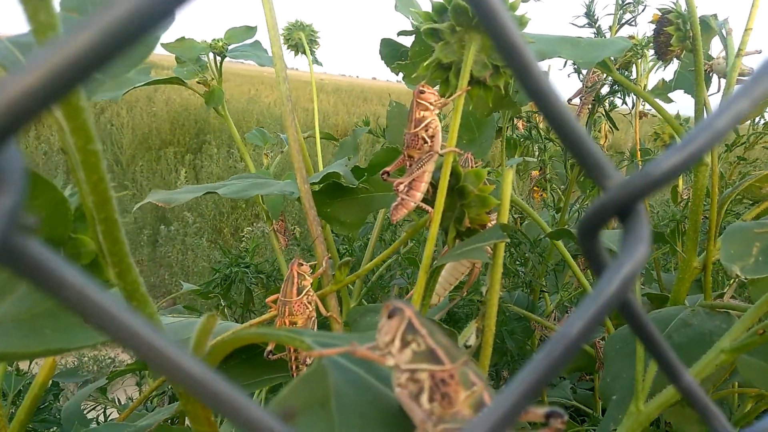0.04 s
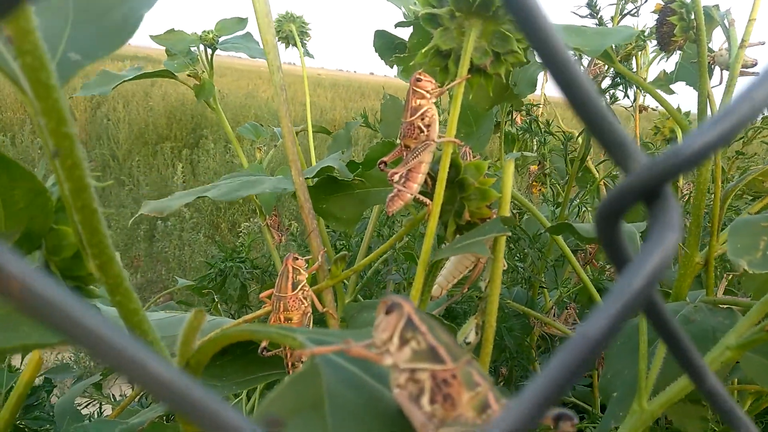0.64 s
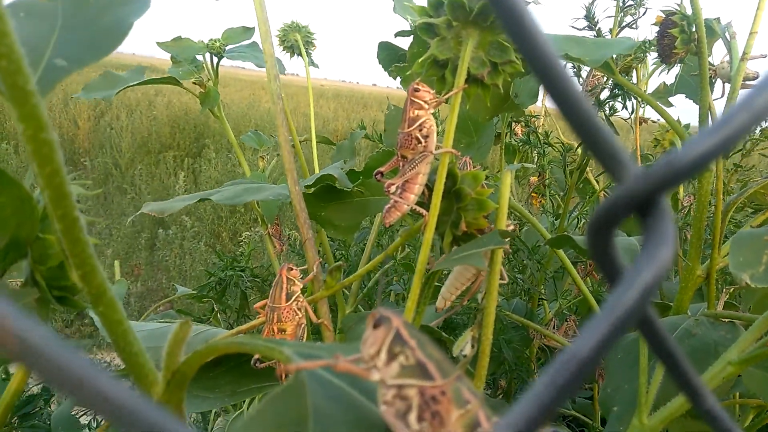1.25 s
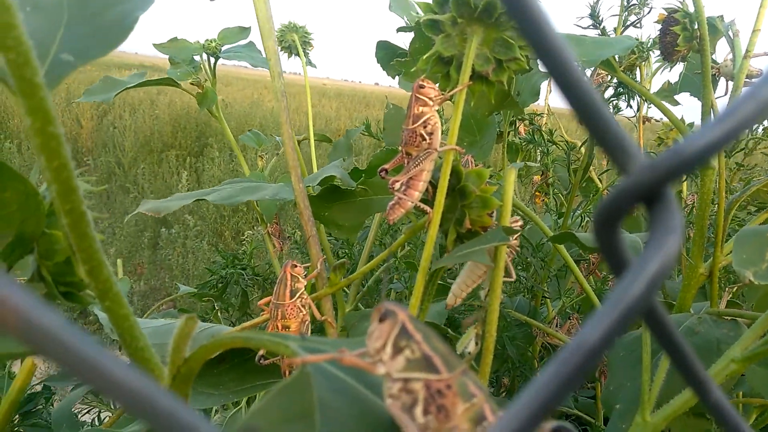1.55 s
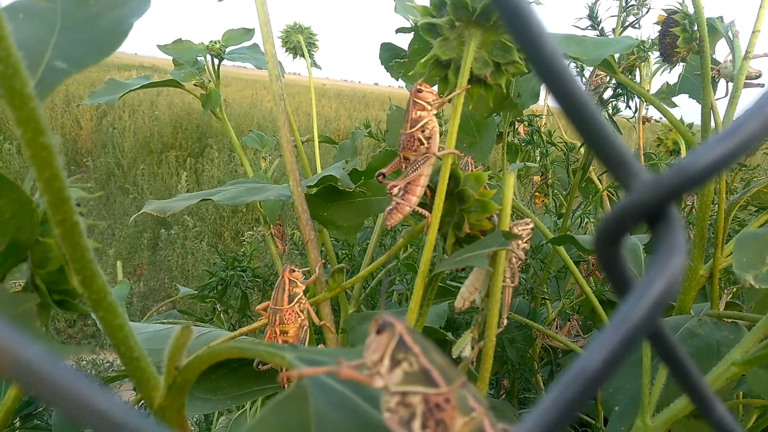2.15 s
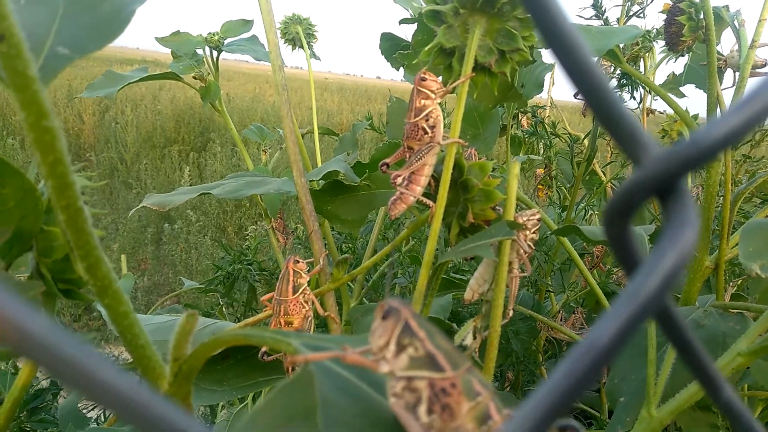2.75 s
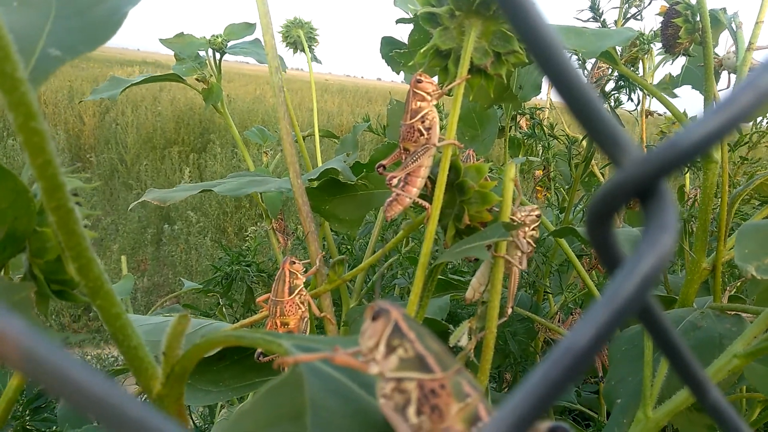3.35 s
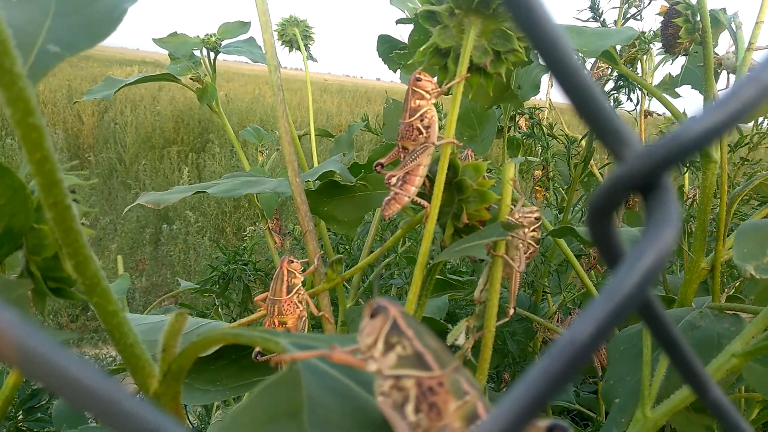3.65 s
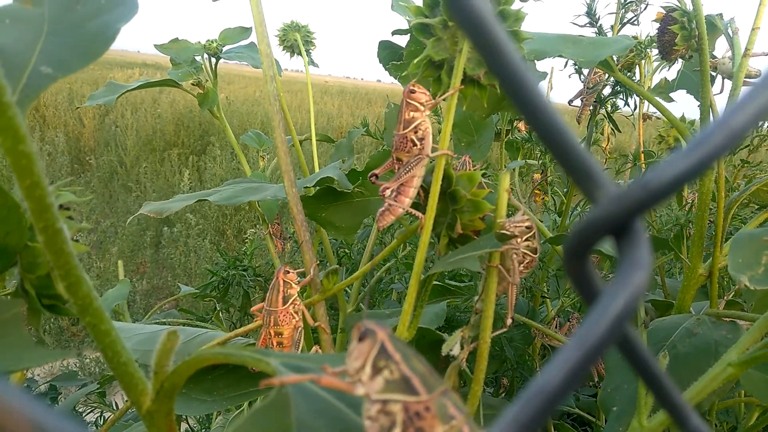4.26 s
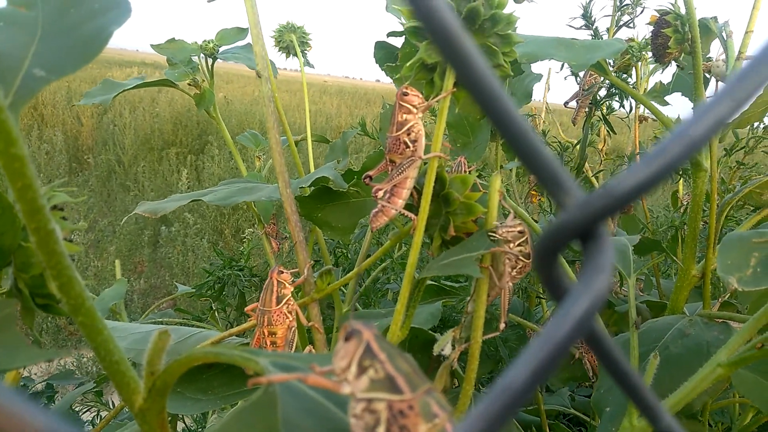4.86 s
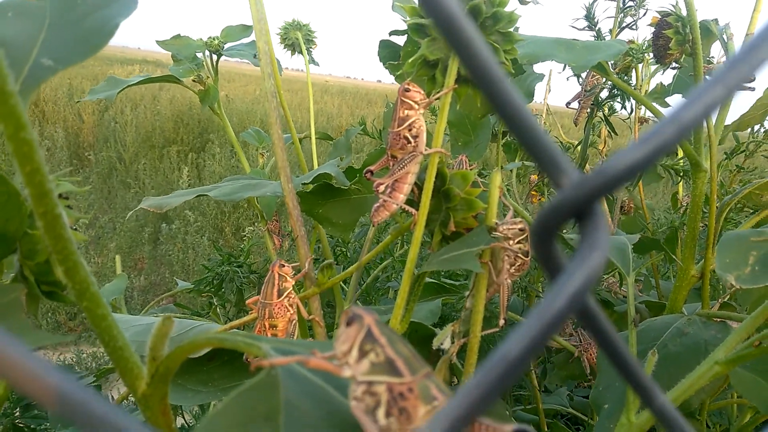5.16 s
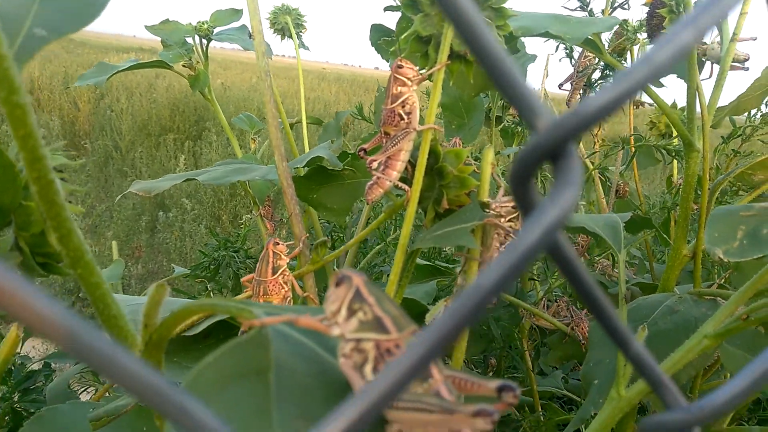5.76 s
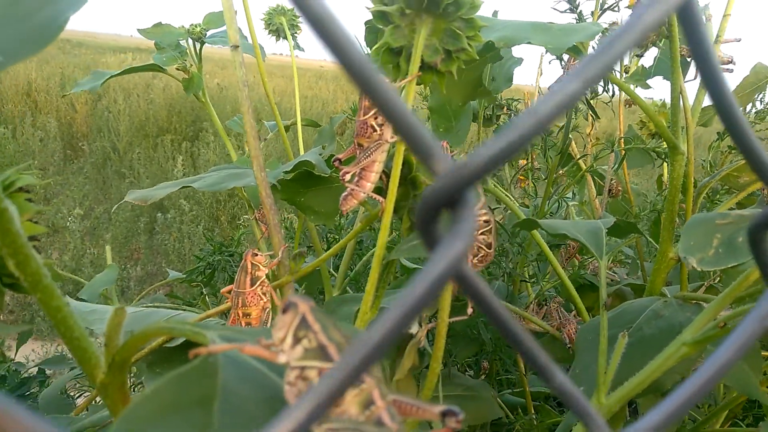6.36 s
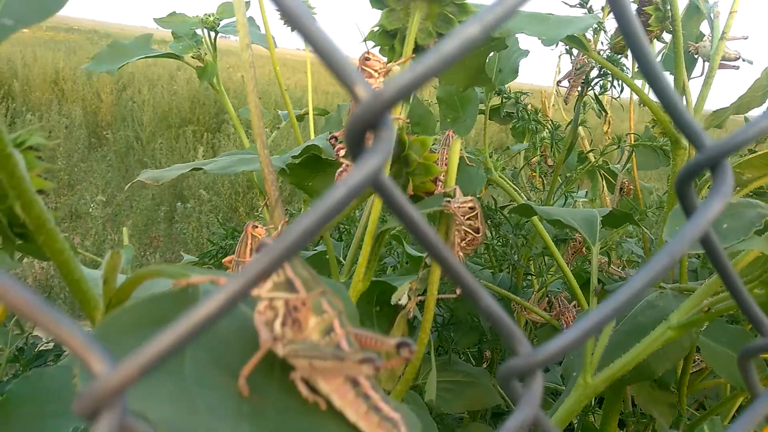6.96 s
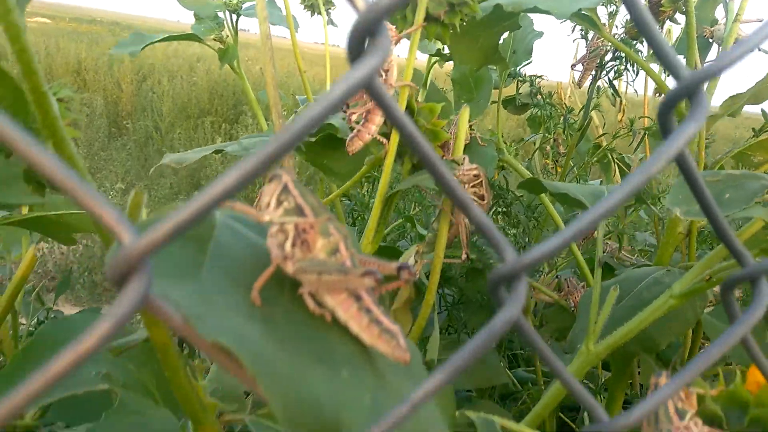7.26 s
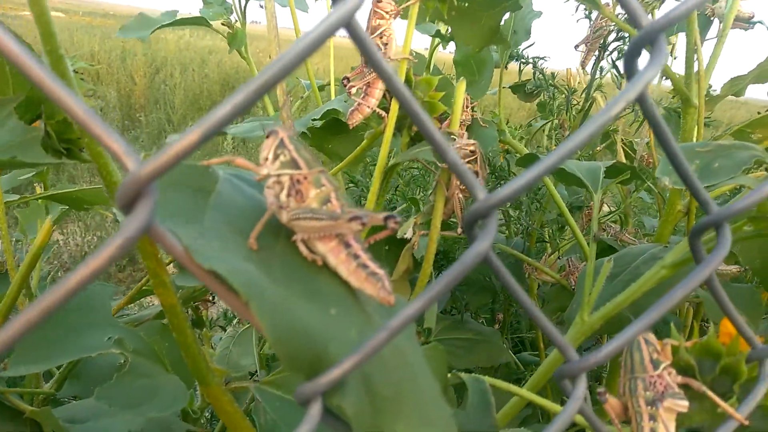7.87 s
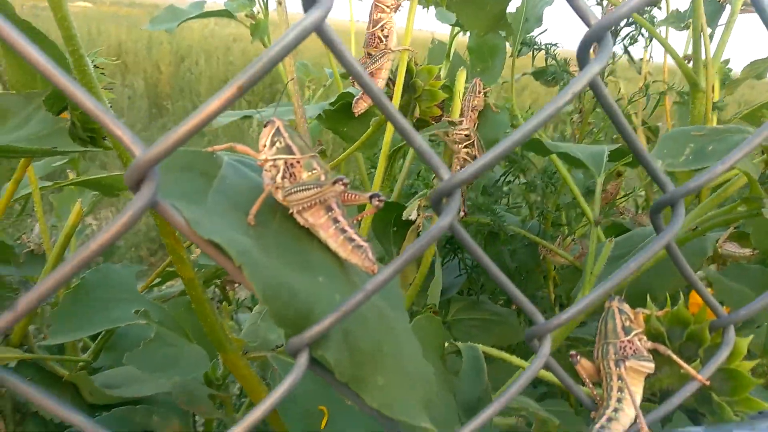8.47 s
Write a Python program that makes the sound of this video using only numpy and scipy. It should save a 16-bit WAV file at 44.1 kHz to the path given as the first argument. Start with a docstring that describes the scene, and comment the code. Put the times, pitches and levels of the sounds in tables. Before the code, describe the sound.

Insects chirp in weeds beside a field throughout: a close one gives short, high chirps once or twice a second, and a farther one chirps faintly between them. Wind rumbles on the microphone, thumping hard around 0.5 seconds, with smaller blows until about 1.8 and again near 3.6 and 5.6. A bird gives short harsh chips at 1.1 and 1.4 seconds, a raspy arched whistle at 2, and a chip with a short falling note at 2.7. More chips come near 5.2, 6.8 and 7.9. Dry stems tick now and then, most sharply at 1.9, and leaves rustle faintly. The wind builds from 7 seconds and thumps strongly near 8, when another insect trills briefly and quietly. A soft hiss and a far, low machine hum continue underneath, the hiss swelling slightly after sharp sounds. Almost everything is on the right; the left carries mostly hiss.

```python
"""Insects chirp in the weeds beside a field while gusts of wind rumble on the right microphone.
The insects scrape their wings together. A bird gives short harsh chips, an arched whistle and a
short falling note. Stems tick and leaves rustle faintly over a soft hiss and a far machine hum.
The left side is almost all hiss; a noise suppressor lets the hiss swell after sharp sounds."""
import sys
import numpy as np
from scipy import signal
from scipy.fft import rfft, irfft, next_fast_len
from scipy.io import wavfile
from scipy.ndimage import uniform_filter1d

SR = 44100
rng = np.random.default_rng(int(sys.argv[2]) if len(sys.argv) > 2 else 0)


def store_pcm(level_fs):
    """Save levels as 16-bit WAV."""
    pcm = np.round(np.clip(level_fs, -1, 1) * 32767).astype(np.int16)
    wavfile.write(sys.argv[1], SR, np.atleast_2d(pcm).T)


N = 376173
TIME = np.arange(N) / SR


def wing_stroke(level_db, start_hz, length_s, sag, roughness):
    """One wing scrapes over ridges on the other: a nearly pure tone that drops as the wing slows."""
    progress = np.linspace(0, 1, int(length_s * SR))
    # uneven scraping shakes the pitch (slip) and the loudness (grip)
    slip, grip = (np.interp(progress, np.linspace(0, 1, 12), row) for row in rng.standard_normal((2, 12)))
    slowing = .5 + .5 * np.tanh((progress - 0.557) / 0.25)
    pitch_hz = start_hz * (1 + rng.normal(0, 0.0046)) * (1 - sag * slowing + 0.031 * roughness * slip)
    force = np.abs(np.sin(np.pi * progress)) ** 0.88 * (1.3 - slowing)
    return from_db(level_db + rng.normal(0, 0.5)) * force * (1 + roughness * grip) * sine(pitch_hz)


def near_insect(loud_db=-56):
    """A close insect makes each chirp from four wing strokes, usually growing louder as they go."""
    # one chirp a row: time_s, level_db, growth_per_stroke_db
    chirps = [(-.068, -54.5, 2), (0.319, -55, 4), (1.368, -59.5, 2), (1.698, -60.5, 2.5), (2.638, -59.5, 4),
              (3.377, -56, 4.5), (3.727, -57.5, 2.5), (4.515, -60, 3), (4.833, -62.5, 1), (5.859, -57, 3),
              (6.605, -62.5, 1), (7.388, -58.5, 3), (7.885, -65, -1), (8.275, -59.5, 2)]
    # the strokes within a chirp: offset_s, relative_level_db, start_pitch_hz
    strokes = [(-.033, -9, 5200), (-.008, 0.5, 5400), (.023, 1, 5527), (.057, -0.5, 5540)]
    out = np.zeros(N)
    for time_s, level_db, growth_db in chirps:
        sag = .1 * from_db(0.95 * min(level_db - loud_db, 0))   # gentler chirps drop less in pitch
        for strokes_left, (offset_s, relative_db, start_hz) in enumerate(strokes[::-1]):
            stroke_db = level_db + relative_db - growth_db * strokes_left
            length_s = 0.027 * rng.uniform(0.88, 1.2)
            add(out, time_s + offset_s, wing_stroke(stroke_db, start_hz, length_s, sag, roughness=0.34))
    return out


def trilling_insect(start_s=7.98, spacing_s=0.031, rise_s=.05, hold_s=0.2, fade_db_per_s=80):
    """Another insect trills with twelve quick wing strokes: it builds up, holds, then tires."""
    out = np.zeros(N)
    for elapsed_s in spacing_s * np.arange(12):
        strength = min((elapsed_s + spacing_s / 2) / rise_s, 1)
        level_db = -71 - fade_db_per_s * max(elapsed_s - hold_s, 0)
        stroke = wing_stroke(level_db, start_hz=5790, length_s=0.027, sag=0.043, roughness=0.51)
        add(out, start_s + elapsed_s, strength * stroke)
    return out


def far_insect(spacing_s=0.033):
    """A farther insect chirps with three faint wing strokes that barely drop in pitch."""
    # one chirp a row: start_s, level_db
    chirps = [(1.06, -78), (1.84, -73), (2.96, -76), (3.855, -72), (5.19, -75.5), (5.6, -76.5), (6.48, -75),
              (6.915, -75.5)]
    out = np.zeros(N)
    for start_s, level_db in chirps:
        for count in range(3):
            stroke = wing_stroke(level_db, start_hz=5120, length_s=0.032, sag=0.023, roughness=0.41)
            add(out, start_s + count * spacing_s, stroke)
    return out


def wind(gustiness_db=3.2, strong_db=-26, churn_width_s=0.016):
    """Swirling air rumbles on the microphone. Finer swirls join as a gust grows; hard blows thump."""
    # wind strength through gusts and lulls: time_s, level_db
    gusts = [(0, -51.5), (.21, -70), (.5, -54), (.75, -41.5), (1.0, -44.5), (1.4, -47), (1.57, -67.5),
             (2.1, -59), (2.45, -67.5), (2.8, -54.5), (3.25, -69), (3.6, -41), (4.05, -65.5), (4.65, -63),
             (5.3, -57), (5.7, -49.5), (6.0, -71.5), (6.45, -63), (6.95, -53), (7.15, -42), (7.4, -48.5),
             (7.9, -42.5), (8.1, -41.5), (8.22, -62), (8.53, -68)]
    # soft puffs on top of the gusts: time_s, level_db
    puffs = [(.278, -45), (.359, -39.5), (.72, -51), (.8, -37.5), (.93, -60), (.99, -40), (1.2, -64),
             (1.684, -40.5), (1.959, -45.5), (2.178, -51), (3.371, -47.5), (3.482, -45), (3.817, -44),
             (3.92, -44), (4.17, -44.5), (5.011, -50.5), (5.128, -47.5), (5.253, -46.5), (5.373, -43.5),
             (5.63, -41.5), (5.801, -44), (5.979, -50), (6.673, -46.5), (6.78, -44), (7.079, -36),
             (7.451, -37.5), (7.517, -39), (7.616, -34), (7.7, -39), (7.762, -34), (8.35, -54)]
    # hard blows of air: time_s, level_db, pitch_hz, fine_swirls_db
    blows = [(0.479, -31, 138, -43.5), (.535, -19.5, 77, -38.5), (0.6, -27, 91, -35.5),
             (0.645, -30, 89.5, -49), (0.866, -31.5, 77.5, -58), (1.083, -34, 80, -69),
             (1.345, -32, 70, -71), (1.772, -31, 61, -59), (3.581, -35.5, 91, -62), (3.649, -32, 71, -56),
             (5.614, -37, 74.6, -54), (7.171, -31.5, 92, -51.5), (7.225, -30, 55.3, -60),
             (7.273, -27, 82.6, -51.5), (7.861, -23, 73.6, -40.5), (7.93, -17.5, 63.3, -38.5),
             (7.996, -21, 54.4, -52)]
    # tone colour of the big swirls: frequency_hz, level_db
    rumble_colour = [(15, -34), (28, -44), (40, -8.5), (54, 1.5), (80, -9), (120, -17), (170, -29.5),
                     (300, -54.5), (600, -65), (1500, -68.5), (6000, -125)]
    # tone colour of the fine swirls: frequency_hz, level_db
    flutter_colour = [(60, -20.5), (120, 6), (180, 1.5), (250, -8.5), (340, -19), (600, -37), (1500, -100),
                      (6000, -115)]
    gust_db, = curves(gusts)
    flow = np.hypot(from_db(gust_db + gustiness_db * drift(24)), smooth_swells(puffs, width_s=0.021))
    churn = from_db(-7) * smooth_swells(blows, churn_width_s)   # air churns around each blow
    out = np.hypot(flow, churn) * swirling_air(rumble_colour)
    fine_flow = from_db(-16) * flow * (flow / from_db(strong_db)) ** 0.44
    fine_churn = smooth_swells([(time_s, fine_db) for time_s, _, _, fine_db in blows], churn_width_s)
    out += np.hypot(fine_flow, fine_churn) * from_db(2 * drift(60)) * swirling_air(flutter_colour)
    t = np.arange(-SR // 20, SR // 20) / SR
    for time_s, level_db, pitch_hz, _ in blows:
        cycles = t * pitch_hz
        thump = np.exp(-.5 * (cycles / 0.6) ** 2) * np.sin(2 * np.pi * cycles)
        add(out, time_s + t[0], from_db(level_db) * thump)
    return filtered(out, 2, 35, "high")


def swirling_air(colour):
    """Low noise with its own slow swells evened out, so that the gusts shape its loudness."""
    swirls = noise(colour)
    return swirls / np.sqrt(uniform_filter1d(power(swirls, 0.041), SR // 60))


def bird_chips(rise_s=0.0026, throat_db=-5.5):
    """Short rattling calls swell and break off, each coloured by a ring in the bird's throat."""
    # one burst a row: start_s, level_db, length_s, decay_s, throat_hz
    chips = [(1.137, -50.5, 0.013, .016, 5500), (1.404, -47, 0.019, 0.005, 3830),
             (2.687, -51, 0.0093, 0.012, 5170), (5.173, -52, .003, 0.0059, 2300),
             (5.183, -51.5, 0.0025, .007, 5000), (6.822, -50.5, 0.019, .006, 3380),
             (7.923, -52.5, 0.012, 0.015, 3400)]
    # tone colour of the rattle: frequency_hz, level_db
    rattle_colour = [(1000, -25), (1700, -14), (2150, -4), (2700, 1.5), (3600, 2), (5000, -0.5), (6500, -3),
                     (8000, -7.5), (10000, -14.5), (15000, -32)]
    out, t = np.zeros(N), np.arange(SR // 4) / SR
    rattle = noise(rattle_colour) * from_db(1.5 * drift(700) - 8)
    for start_s, level_db, length_s, decay_s, throat_hz in chips:
        swell = np.minimum(t / rise_s, 1) * np.interp(t, [0, length_s], [0.56, 1])
        fade = np.exp(-np.maximum(t - length_s, 0) / decay_s)
        chip = from_db(level_db) * swell * fade * rattle[round(start_s * SR):][:len(t)]
        add(out, start_s, chip + from_db(throat_db) * ring(chip, throat_hz, sharpness=8))
    return out


def whistle(path, base_db, overtone_db, hoarse_db, glide_s=0.005, flutter_hz=480):
    """The bird's voice box sings a sliding note with overtones; its flutter makes the note rasp."""
    # tone colour of the hoarse noise: frequency_hz, level_db
    hoarse_colour = [(600, -3.5), (1300, -11), (2200, -18), (3300, -2), (4200, -7), (5100, 0), (5600, -20),
                     (6100, -6), (7000, -30), (15000, -40)]
    pitch_hz, level_db, rasp = curves(path)
    pitch_hz = uniform_filter1d(pitch_hz, int(glide_s * SR)) * (1 + 0.00215 * drift(500))
    base = from_db(base_db + 2.6 * rasp) * sine(pitch_hz)
    overtones = sine(2 * pitch_hz) + rasp * from_db(-2.5) * sine(3 * pitch_hz)
    tone = base + from_db(overtone_db - 5.4 * rasp) * overtones
    flutter = .85 * sine(flutter_hz * (1 + 0.031 * drift(100)))
    hoarseness = rasp * from_db(hoarse_db) * noise(hoarse_colour)
    voice = filtered(tone * (1 + rasp * flutter) + hoarseness, 12, 6850)
    singing = (TIME > path[0][0]) & (TIME < path[-1][0])
    return from_db(level_db + 2 * rasp * drift(260)) * voice * singing


def bird_whistles():
    """The bird sings a harsh arched whistle that clears as it falls, then a short falling note."""
    # path of the arched whistle: time_s, pitch_hz, level_db, rasp (0 clear to 1 harsh)
    arched_path = [(2.01, 1640, -68, .3), (2.02, 1810, -59, 0), (2.028, 2020, -58.5, 0.5),
                   (2.066, 2148, -55, 0.6), (2.098, 2175, -54.5, 0.8), (2.124, 2060, -60, 0.9),
                   (2.13, 1945, -55, 0), (2.15, 1833, -55, 0), (2.16, 1705, -56.5, 0.2),
                   (2.208, 1580, -65.5, 0.3), (2.254, 1555, -66, 0.1), (2.285, 1390, -69, 0.1)]
    # path of the short note: time_s, pitch_hz, level_db, rasp (0 clear to 1 harsh)
    falling_path = [(2.705, 2070, -59, 0.72), (2.735, 1947, -66, 0.57), (2.757, 1750, -59.5, 0.56),
                    (2.81, 1540, -72, 0.33)]
    arched = whistle(arched_path, base_db=-13, overtone_db=-2.5, hoarse_db=-8)
    falling = whistle(falling_path, base_db=-12.5, overtone_db=-10, hoarse_db=-7)
    return arched + falling


def stem_ticks(ring_hz=3640, ring_decay_s=0.0057):
    """Dry stems snap sharply and ring for a moment."""
    # one tick a row: time_s, level_db, decay_s, relative_ring_db
    ticks = [(1.594, -62, 0.0088, -23), (1.944, -43, 0.0021, -30), (2.898, -54.5, 0.0045, -9),
             (2.902, -60.5, 0.0033, -3), (2.912, -61.5, 0.0019, -18), (3.019, -70, .003, -9),
             (3.209, -65, 0.0033, -13), (4.615, -60.5, 0.0031, -11), (5.545, -66, .0036, 1),
             (6.158, -55.5, 0.0039, -17), (7.135, -59.5, 0.0037, -14), (8.342, -73, .002, 1)]
    # tone colour of a snap: frequency_hz, level_db
    snap_colour = [(1000, -28), (1400, -8), (1750, -2.5), (2300, -21), (3600, -25), (4600, -4), (6400, 7),
                   (8300, 3), (10500, -6), (15000, -12)]
    snaps = bursts([(time_s, level_db, .0002, decay_s) for time_s, level_db, decay_s, _ in ticks])
    rings = bursts([(time_s, db + ring_db, .0004, ring_decay_s) for time_s, db, _, ring_db in ticks])
    snap_noise = noise(snap_colour)
    ring_noise = unit_level(ring(rng.standard_normal(N), ring_hz, sharpness=38))
    return snaps * snap_noise + rings * ring_noise


def leaf_rustles(crackle_db=4):
    """Leaves brush together with a grainy hiss."""
    # one rustle a row: peak_time_s, level_db, rise_s, decay_s
    rustles = [(.02, -79, 0.013, 0.15), (.38, -71, 0.028, 0.026), (2.93, -76, 0.016, 0.068),
               (3.752, -72.5, 0.011, 0.032), (3.84, -73.5, 0.056, 0.098), (7.106, -67.5, 0.013, 0.017),
               (7.145, -72.5, 0.013, 0.1), (7.46, -74, 0.022, 0.042), (7.65, -73, 0.0088, 0.025),
               (7.785, -69.5, 0.0092, 0.007), (7.87, -72, 0.015, 0.031), (8.125, -71, 0.0068, 0.03),
               (8.337, -68, 0.0059, 0.012)]
    # tone colour of the leaves: frequency_hz, level_db
    leaf_colour = [(300, 14.5), (800, 9), (1800, -1), (2350, 1), (2800, 3), (3400, -4.5), (4200, -2.5),
                   (5200, 4.5), (8000, -22), (15000, -27)]
    return bursts(rustles) * noise(leaf_colour) * from_db(crackle_db * drift(350) + 9.5)


def ground_echo(sound, delay_s=.016, echo_db=-15):
    """The sound is joined by one fainter copy that bounces off the ground."""
    out = sound.copy()
    add(out, delay_s, from_db(echo_db) * sound)
    return out


def field_echoes(sound, near_db, far_db, near_fade_s=0.044, far_fade_s=0.54):
    """Ground and leaves scatter sound and soak up its treble: quick echoes, then a long faint tail."""
    t = np.arange(SR // 2) / SR
    echoes = 0
    for level_db, fade_s in ((near_db, near_fade_s), (far_db, far_fade_s)):
        scatter = rng.standard_normal(len(t)) * from_db(-60 * t / fade_s) * (t > .003)
        echoes = echoes + from_db(level_db) * unit_level(scatter) / np.sqrt(len(t))
    return sound + signal.fftconvolve(sound, filtered(echoes, 2, 7500))[:N]


def machine_hum(pitch_hz=116.8, level_db=-61):
    """A far machine hums on one low note that wavers in loudness and pitch."""
    return from_db(level_db + 1.6 * drift(14)) * sine(pitch_hz * (1 + 0.083 * drift(45)))


def air_hiss(left_db=-65, right_db=-62.5):
    """The open air hisses softly on both sides; on the right it follows the breeze."""
    # rise and fall of the breeze: time_s, gain_db
    breeze = [(0, 0), (.25, -1.5), (.6, 4), (1.0, -1.5), (1.25, -0.5), (1.75, -3), (2.15, 1.5), (2.4, -2),
              (3.2, -0.5), (4.2, -1.5), (4.7, -1), (5.6, 0), (6.5, -2.5), (7.2, -1), (7.9, 1), (8.53, -0.5)]
    # tone colour of the left hiss: frequency_hz, level_db
    left_colour = [(20, -16.5), (55, 2), (110, -4.5), (250, -10), (500, -15.5), (980, -18.5), (1150, -25),
                   (2900, -27.5), (3400, -31), (6500, -33), (9000, -29.5), (15500, -35)]
    # tone colour of the right hiss: frequency_hz, level_db
    right_colour = [(20, -27), (55, 6.5), (90, -13.5), (130, -2), (170, -5.5), (250, -6), (500, -10),
                    (980, -14.5), (1200, -20), (2500, -22), (4200, -25.5), (5200, -22.5), (6500, -27.5),
                    (9000, -24.5), (15500, -30.5)]
    breeze_db, = curves(breeze)
    left = from_db(left_db) * noise(left_colour)
    right = from_db(right_db + breeze_db + .5 * drift(10)) * noise(right_colour)
    return wavering_treble(left), wavering_treble(right)


def wavering_treble(hiss, above_hz=5000, waver_db=1.8):
    """The high part of the hiss swells and sinks."""
    # slow changes of the treble: time_s, gain_db
    treble = [(0, 2), (.3, 0), (.48, 0), (.7, 0.5), (.95, 2), (1.25, 2), (1.65, 4), (1.87, 1.5),
              (2.1, -1.5), (2.5, -1.5), (2.95, 0.5), (4.3, 0.5), (5.35, 1), (6.5, 0), (7.1, 2), (7.5, 1),
              (7.97, 1.5), (8.3, -1), (8.53, 0)]
    treble_db, = curves(treble)
    low = filtered(hiss, 1, above_hz)
    return low + (hiss - low) * from_db(treble_db + waver_db * drift(14))


def noise_suppressor(stereo, threshold_db=-74, range_db=8, left_cut_db=1.5, right_cut_db=5.5):
    """Turns down all but the bass until the treble rises on the right, then slowly turns it down again."""
    bands_hz = [(1500, 2700), (2700, 4500), (6500, 9000), (9000, 13000)]
    bands = [filtered(stereo[1], 3, edges_hz, "band") for edges_hz in bands_hz]
    treble_db = np.mean([10 * np.log10(power(band, 0.005)) for band in bands], axis=0)
    fall_db = 45 * TIME   # each peak is remembered and sinks by 45 dB a second
    held_db = np.maximum.accumulate(treble_db + fall_db) - fall_db
    cut_share = 1 - np.clip((held_db - threshold_db) / range_db, 0, 1)
    bass = filtered(stereo, 1, 300)
    return bass + (stereo - bass) * from_db(-np.outer([left_cut_db, right_cut_db], cut_share))


def from_db(db):
    """Turns decibels into a number to multiply a sound by."""
    return 10 ** (np.asarray(db) / 20)


def unit_level(sound):
    """Scales a sound to an average power of 1."""
    return sound / np.sqrt(np.mean(sound ** 2) + 1e-20)


def power(sound, window_s):
    """The sound's power, averaged over a short sliding window."""
    return np.abs(uniform_filter1d(sound ** 2, max(int(window_s * SR), 2))) + 1e-16


def curves(rows):
    """Joins rows of (time_s, values...) with straight lines: one curve for each value column."""
    times_s, *columns = np.transpose(rows)
    return [np.interp(TIME, times_s, column) for column in columns]


def noise(colour):
    """Noise of power 1, shaped by rows of (frequency_hz, level_db)."""
    frequency_hz, level_db = np.transpose(colour)
    size = next_fast_len(N)
    log_hz = np.log(np.arange(size // 2 + 1) * SR / size + 1)
    gains = from_db(np.interp(log_hz, np.log(frequency_hz), level_db))
    return unit_level(irfft(rfft(rng.standard_normal(size)) * gains, size)[:N])


def drift(steps_per_s):
    """A random wander with a typical size of 1."""
    points = rng.standard_normal(N // 8)
    return unit_level(np.interp(TIME * steps_per_s, np.arange(len(points)), points))


def sine(pitch_hz):
    """A pure tone that follows a changing pitch."""
    return np.sin(2 * np.pi * np.cumsum(pitch_hz) / SR)


def filtered(sound, order, edge_hz, keep="low"):
    """Keeps the lows, the highs or a band; a higher order cuts more steeply."""
    return signal.sosfilt(signal.butter(order, edge_hz, keep, fs=SR, output="sos"), sound)


def ring(sound, pitch_hz, sharpness):
    """Keeps the part of a sound near one pitch, so that it rings there."""
    return signal.lfilter(*signal.iirpeak(pitch_hz, sharpness, fs=SR), sound)


def add(out, start_s, sound):
    """Mixes a sound into out from start_s on."""
    at = round(start_s * SR) + np.arange(len(sound))
    inside = (at >= 0) & (at < N)
    out[at[inside]] += sound[inside]


def bursts(rows):
    """A loudness curve of bursts that each rise to a peak and die away."""
    out, t = np.zeros(N), np.arange(-SR // 10, SR // 2) / SR
    for peak_time_s, level_db, rise_s, decay_s in rows:
        shape = np.exp(np.where(t < 0, -.5 * (t / rise_s) ** 2, -t / decay_s))
        add(out, peak_time_s + t[0], from_db(level_db) * shape)
    return out


def smooth_swells(rows, width_s):
    """A loudness curve of bell-shaped swells."""
    out, t = np.zeros(N), np.arange(-SR // 5, SR // 5) / SR
    for time_s, level_db, *_ in rows:
        add(out, time_s + t[0], from_db(level_db) * np.exp(-.5 * (t / width_s) ** 2))
    return out


def scene():
    """Sets each source's level and mixes left and right; field sounds and wind barely reach the left."""
    insects = ground_echo(near_insect() + trilling_insect())
    insects = from_db(5.5) * field_echoes(insects, near_db=-6.5, far_db=-7.5)
    bird = from_db(4) * field_echoes(bird_chips() + bird_whistles(), near_db=-9, far_db=-11.5)
    plants = field_echoes(stem_ticks() + leaf_rustles(), near_db=-16, far_db=-5)
    far_chirps = from_db(4.5) * field_echoes(far_insect(), near_db=-2.5, far_db=-9)
    field = insects + far_chirps + bird + plants
    hum = machine_hum()
    left_hiss, right_hiss = air_hiss()
    left = left_hiss + from_db(-43) * field + from_db(-46) * wind()
    right = right_hiss + hum + field + wind()
    return np.array([left, right])


def record(dry):
    """Both sides pass through the noise suppressor, then lose the highest treble."""
    treble_cut = signal.ellip(12, .1, 70, 15750, fs=SR, output="sos")
    return signal.sosfilt(treble_cut, noise_suppressor(dry))


dry = scene()
out = record(dry)
store_pcm(out)
```